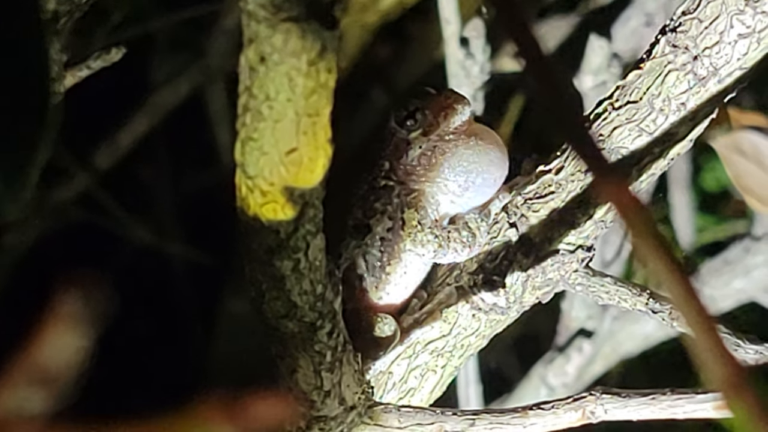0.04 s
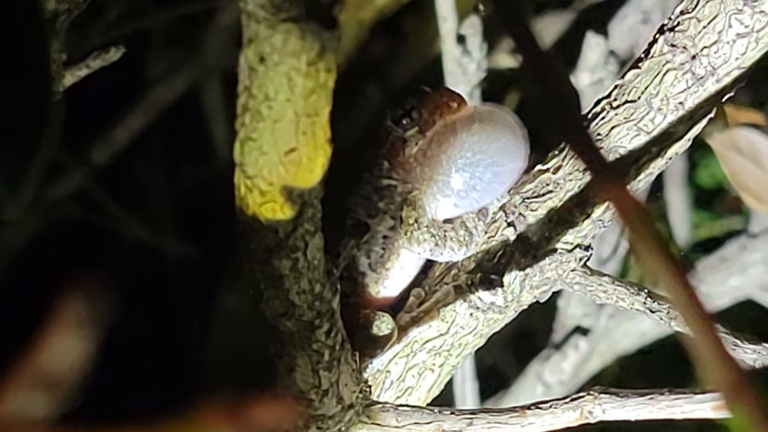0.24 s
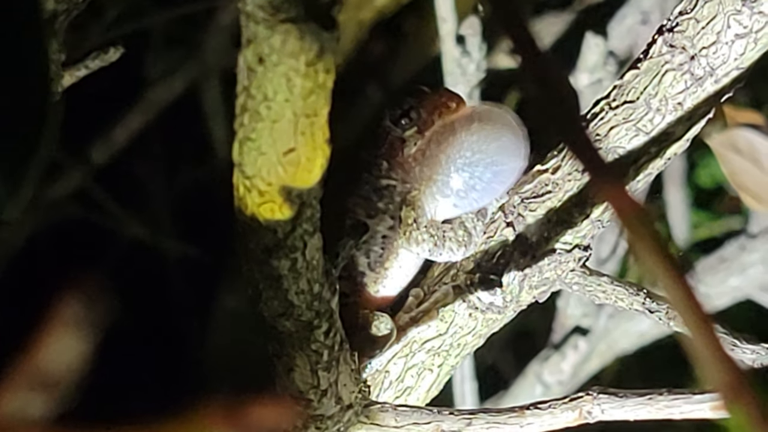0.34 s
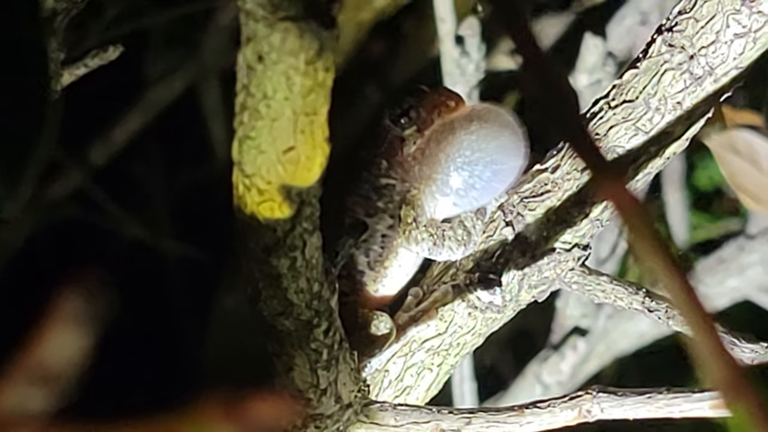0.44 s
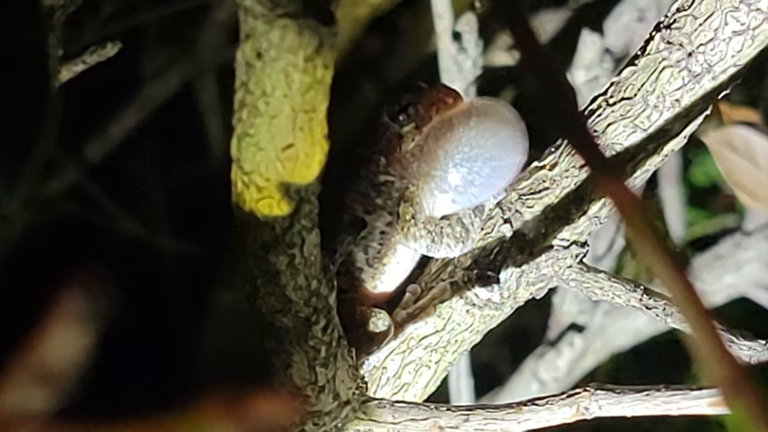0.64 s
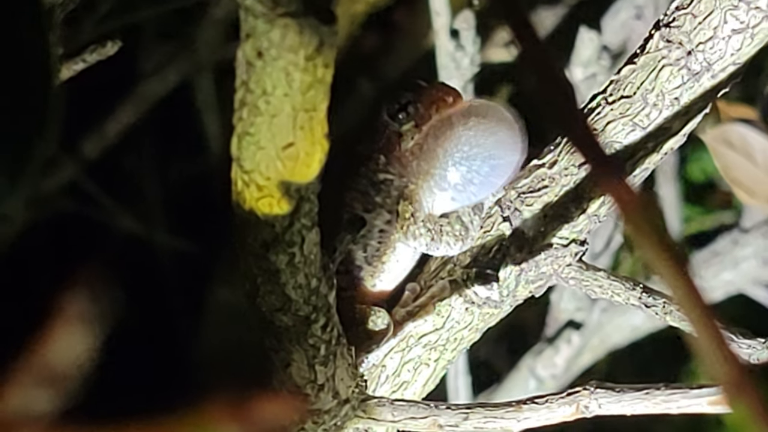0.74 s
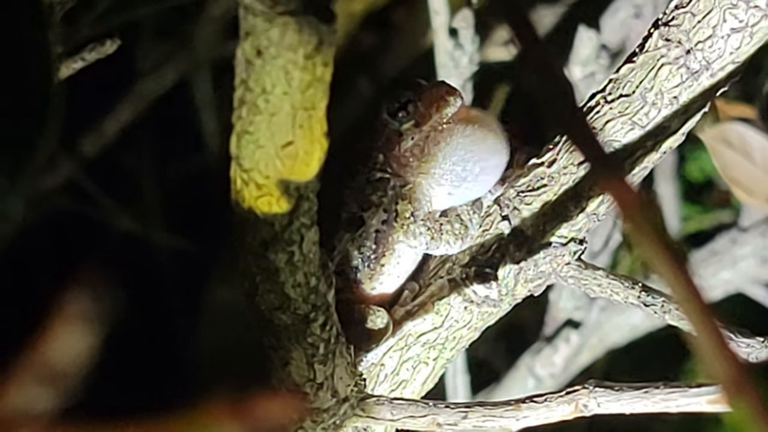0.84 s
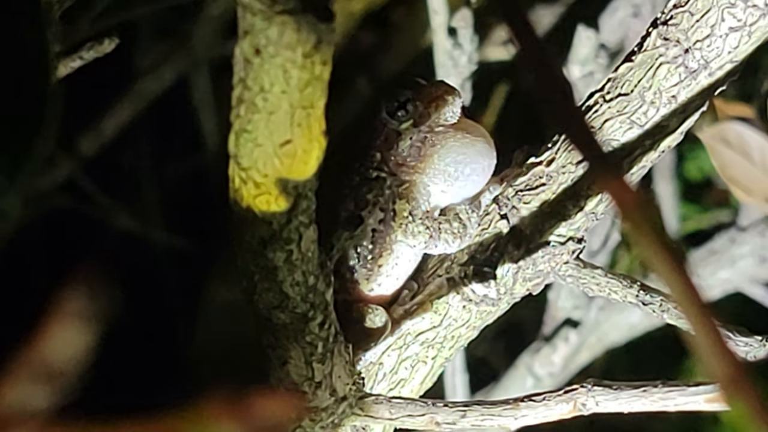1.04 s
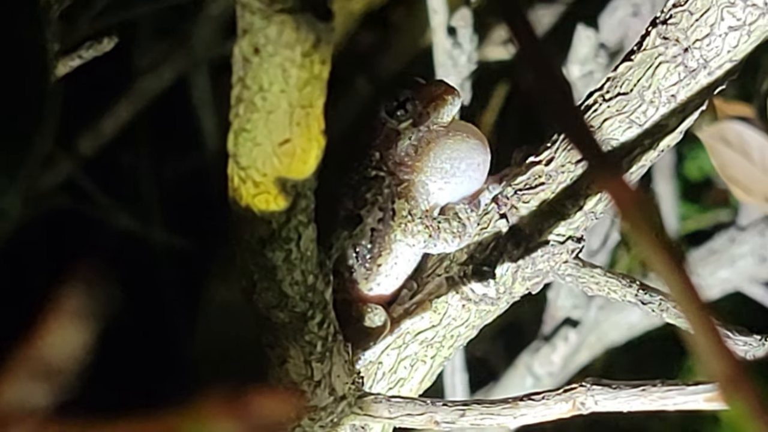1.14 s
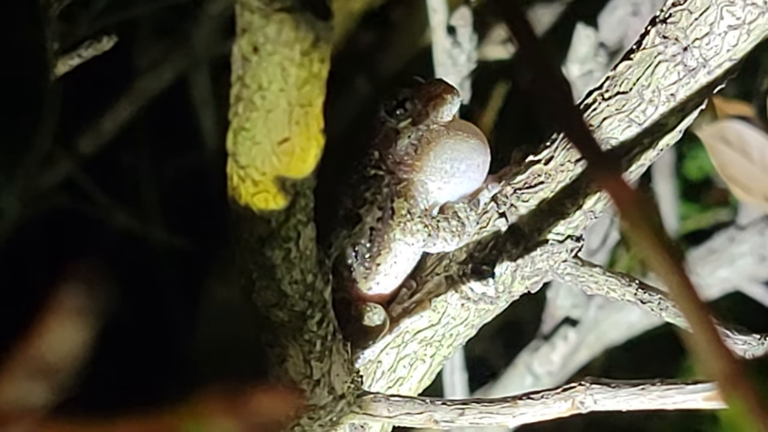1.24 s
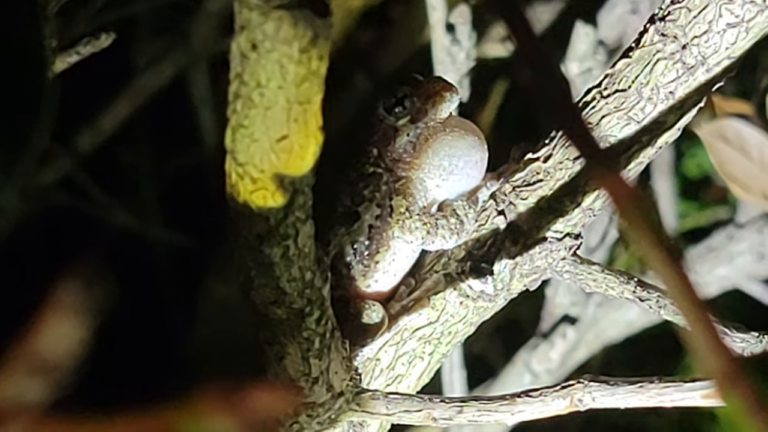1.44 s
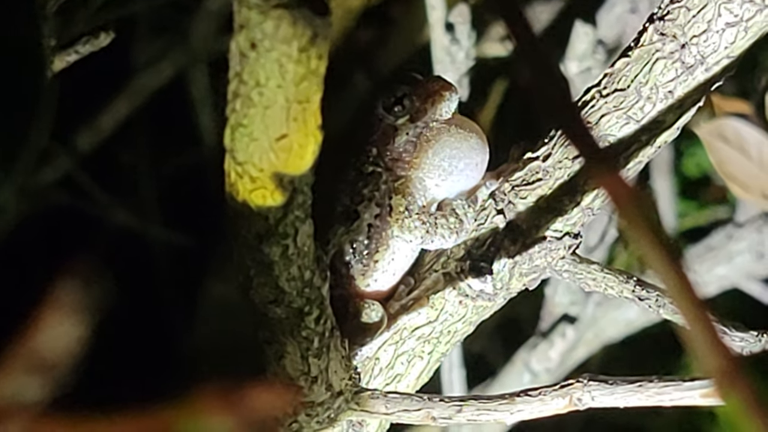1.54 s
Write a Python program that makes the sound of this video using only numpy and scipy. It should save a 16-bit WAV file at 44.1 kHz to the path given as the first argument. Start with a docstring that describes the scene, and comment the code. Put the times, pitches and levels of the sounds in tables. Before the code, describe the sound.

A tree frog gives one loud, buzzing trill close by at night.

```python
"""A tree frog close by on a branch gives one buzzing trill at night; a farther one finishes its own.
Each pulse of a trill is a short upward chirp with overtones, coloured by the vocal sac and echoed
by branches and foliage. Leaves rustle faintly and something bumps softly, over a low distant hum,
rumble, a faint distant chorus and thin hiss."""
import sys
import numpy as np
from scipy import signal
from scipy.fft import rfft, irfft, next_fast_len
from scipy.io import wavfile
from scipy.ndimage import uniform_filter1d

SR = 44100
rng = np.random.default_rng(int(sys.argv[2]) if len(sys.argv) > 2 else 0)


def transcribe(u):
    """Save the signal u as a 16-bit wav file named by the first command-line argument.

    u: samples, shape (n,) or (channels, n), limited to [-1, 1]; the rate is SR.
    q: integer samples, one column per channel.
    """
    v = np.clip(np.atleast_2d(u).T, -1, 1)
    q = np.round(v * 32767).astype(np.int16)
    wavfile.write(sys.argv[1], SR, q)


N = 70560


def amp(db):
    """Decibels to gain."""
    return 10 ** (np.asarray(db) / 20)


def unit(x):
    """Scale to unit rms."""
    return x / np.sqrt(np.mean(x ** 2) + 1e-20)


def lookup(table, hz, column=1):
    """Interpolate a table column over log frequency."""
    columns = np.transpose(table)
    return np.interp(np.log(hz + 1), np.log(columns[0] + 1), columns[column])


def shape(x, gain):
    """Filter x by gain(hz)."""
    size = next_fast_len(2 * x.shape[-1])
    return irfft(rfft(x, size) * gain(np.fft.rfftfreq(size, 1 / SR)), size)[..., :x.shape[-1]]


def highpass(f, corner_hz, order=4):
    """High-pass gain, one half at the corner."""
    return f ** order / (f ** order + corner_hz ** order)


def minimum_phase(db):
    """Response with these levels that rings after the sound, never before."""
    cepstrum = irfft(np.log(amp(db)))
    half = cepstrum.shape[-1] // 2
    return np.exp(rfft(cepstrum * np.r_[1, np.full(half - 1, 2), 1, np.zeros(half - 1)]))


def noise_band(centre_hz, width_hz):
    """Stereo noise in a Gaussian band, unit rms."""
    white = rng.standard_normal((2, N))
    return unit(shape(white, lambda f: np.exp(-.5 * ((f - centre_hz) / width_hz) ** 2)))


def add(mix, start_s, sound):
    """Mix a sound in at start_s."""
    at = round(start_s * SR)
    sound = sound[..., max(-at, 0):]
    part = mix[..., max(at, 0):][..., :sound.shape[-1]]
    part += sound[..., :part.shape[-1]]


# Night air spectrum: freq_hz, relative_db
AIR_SPECTRUM = [(15, -54), (25, -16.5), (74, -3.5), (123, -16), (200, -23.5), (241, -24), (324, -27.5),
                (361, -31), (637, -29), (981, -23.5), (1220, -27), (2810, -21.5), (3580, -26.5),
                (4570, -26.5), (15800, -34.5)]
# Left-right likeness of the air: freq_hz, correlation
AIR_CORRELATION = [(60, 0.88), (180, 0.88), (550, 0.2), (1650, -0.17), (4970, -0.12), (15000, 0.028)]

def night_air():
    """Low rumble in the centre; thin, wide hiss leaning left."""
    left, spare = rng.standard_normal((2, N))
    likeness = lambda f: lookup(AIR_CORRELATION, f)
    right = shape(left, likeness) + shape(spare, lambda f: np.sqrt(1 - likeness(f) ** 2))
    pan_db = np.array([[2.5], [-2.5]])
    spectrum = lambda f: amp(lookup(AIR_SPECTRUM, f) + pan_db * (f > 300)) * highpass(f, 28)
    return amp(-48) * unit(shape(np.array([left, right]), spectrum))


# Hum tones: pitch_hz, rms_db
HUM_TONES = [(75, -59.5), (119, -59.5), (359, -70), (597, -79.5)]

def hum():
    """Distant low tones, wavering in phase."""
    t = np.arange(N) / SR
    out = np.zeros(N)
    for pitch_hz, rms_db in HUM_TONES:
        wander_rad = .012 * np.cumsum(rng.standard_normal(N))
        out += amp(rms_db) * np.sqrt(2) * np.sin(2 * np.pi * pitch_hz * t + wander_rad)
    return out


def high_hiss():
    """Very high hiss that swells and flickers slightly."""
    band = noise_band(centre_hz=14800, width_hz=1300)
    drift = lambda rate_hz: unit(shape(rng.standard_normal(N), lambda f: np.exp(-(f / rate_hz) ** 2)))
    return band * amp(-63.5 + 2.2 * drift(rate_hz=9) + 2 * drift(rate_hz=150))


# Chorus envelope: time_s, level_db
CHORUS_LEVELS = [(0, -65), (1.1, -63.5), (1.2, -60.5), (1.35, -68.5), (1.42, -56.5), (1.5, -65), (1.6, -57)]

def chorus():
    """Distant callers blur into one faint narrow band."""
    level_db = np.interp(np.arange(N) / SR, *np.transpose(CHORUS_LEVELS))
    return noise_band(centre_hz=2866, width_hz=110) * amp(level_db)


def burst(level_db, centre_hz, rise_s, decay_s, width_oct, grain_db):
    """Puff of band noise; the higher it is, the wider in stereo."""
    t = np.arange(SR // 2) / SR
    grains = amp(grain_db * unit(uniform_filter1d(rng.standard_normal(len(t)), 60)))
    shared, left, right = rng.standard_normal((3, len(t)))
    spread = centre_hz / (centre_hz + 1200)
    noise = grains * ((1 - spread) * shared + spread * np.array([left, right]))
    band = shape(noise, lambda f: np.exp(-.5 * (np.log2((f + 1) / centre_hz) / width_oct) ** 2))
    envelope = np.minimum(t / rise_s, 1) * np.exp(-np.maximum(t - rise_s, 0) / decay_s)
    return amp(level_db) * unit(band) * envelope


# Leaf rustles: start_s, level_db, centre_hz, width_oct, rise_s, decay_s
LEAF_RUSTLES = [(0.018, -51.5, 4300, 0.54, 0.025, 0.092), (0.204, -48, 6500, 1, 0.014, 0.068),
                (.262, -59.5, 5000, 1, .012, .025), (1.045, -54, 2400, 0.69, 0.0071, 0.12),
                (1.068, -38, 2140, 0.25, .007, .009), (1.109, -57, 2260, .5, .01, 0.04),
                (1.255, -56, 4000, 1.2, 0.011, 0.027), (1.414, -42.5, 2050, 0.81, 0.0068, 0.0087),
                (1.435, -43, 1730, .35, 0.007, .013), (1.46, -47.5, 4000, 0.77, .012, 0.044),
                (1.495, -43.5, 4500, 1.3, 0.01, 0.02)]
# Low bumps: start_s, level_db, pitch_hz, rise_s, decay_s
SOFT_BUMPS = [(.002, -44, 53.7, 0.024, 0.025), (.04, -60, 700, 0.016, 0.06),
              (0.181, -53, 199, 0.011, 0.042), (.265, -50.5, 583, .012, 0.035),
              (1.509, -49, 556, 0.0032, 0.013), (1.56, -50.5, 360, 0.015, 0.075),
              (1.572, -57, 600, .008, .025)]

def undergrowth():
    """Grainy leaf rustles to the left, and soft narrow-band bumps."""
    out = np.zeros((2, N))
    for start_s, level_db, centre_hz, width_oct, rise_s, decay_s in LEAF_RUSTLES:
        rustle = burst(level_db, centre_hz, rise_s, decay_s, width_oct, grain_db=3)
        add(out, start_s, rustle * amp([[2], [-2]]))
    for start_s, *bump in SOFT_BUMPS:
        add(out, start_s, burst(*bump, width_oct=.06, grain_db=0))
    return out


# Foliage reverberation: freq_hz, level_db, t60_s
FOLIAGE_BANDS = [(300, -29, .15), (1400, -21, 0.24), (1990, -21, 0.11), (2500, -12.5, 0.35),
                 (3200, -18, .16), (4000, -18.5, 0.17), (8100, -4.5, .06)]

def foliage(voice):
    """Diffuse scatter from leaves and trunks, each band dying at its own rate."""
    hz, t, noise = signal.stft(rng.standard_normal((2, SR // 2)), SR, nperseg=256)
    t60_s = lookup(FOLIAGE_BANDS, hz, column=2)[:, None]
    decay = amp(-60 * t / t60_s) * (t > .004)
    energy = (decay ** 2).sum(1, keepdims=True) * t[1] * SR
    decay *= amp(lookup(FOLIAGE_BANDS, hz))[:, None] / np.sqrt(energy)
    tail = signal.istft(noise * decay, SR, nperseg=256)[1]
    return signal.fftconvolve(voice[None], tail, axes=1)[:, :N]


def swell(t, rise_s=.0051, fall_s=.0052):
    """Pulse envelope, cresting at t = 0; the onset is steeper than a bell curve."""
    return np.exp(-np.where(t < 0, abs(t / rise_s) ** 2.23, (t / fall_s) ** 2))


def pulse(centre_s, pitch_hz, level_db, overtones_db, partials, length_ratio=1):
    """One chirp: pitch scoops in and slides up, with rasp at the crest. Returns start_s, sound."""
    start = round(centre_s * SR) - 800
    t = ((start + np.arange(1800)) / SR - centre_s) / length_ratio
    scoop = .09 * length_ratio ** 2 * (1 - np.tanh((t + .0059) / .00086))
    slide = .074 * length_ratio * np.tanh((t + .0007) / .0016)
    phase = 2 * np.pi * np.cumsum(pitch_hz * (1 + slide - scoop)) / SR
    tone = np.zeros(len(t))
    for k, (partial_db, sharpness, lead_s) in enumerate(partials, 1):
        gain = amp(partial_db + overtones_db * (k > 1))
        tone += gain * swell(t + lead_s) ** sharpness * np.sin(k * phase)
    rasp_band = lambda f: highpass(f, 2500, order=2) / (1 + (f / 7500) ** 8)
    rasp = unit(shape(rng.standard_normal(len(t)), rasp_band))
    return start / SR, amp(level_db) * (tone + amp(overtones_db - 36) * swell(t) ** 2 * rasp)


# Far frog's harmonics, first upward: relative_db, envelope_power, lead_s
FAR_HARMONICS = [(-2.5, 2.1, 0.00062), (6, 1.25, 0.001), (-17.5, 2, 0.002)]

def far_frog(start_s=.0078, period_s=.01988, pulse_count=13):
    """The neighbour's even trill, duller and more reverberant."""
    voice = np.zeros(N)
    echo_s, echo_db = .0052, -8
    for k, (time_jitter, level_jitter) in enumerate(rng.standard_normal((pulse_count, 2))):
        centre_s = start_s + k * period_s + .00014 * time_jitter
        level_db = -28.5 - .04 * level_jitter
        at_s, chirp = pulse(centre_s, 1240, level_db, overtones_db=0, partials=FAR_HARMONICS)
        add(voice, at_s, chirp)
        add(voice, at_s + echo_s, amp(echo_db) * shape(chirp, lambda f: highpass(f, 1800)))
    return (voice + amp(13.5) * foliage(voice)) * amp([[0], [-3.5]])


# Colour of sac and surroundings: freq_hz, left_db, right_db
SAC_COLOUR = [(514, 0.9, 0.1), (870, -8.5, -10.5), (1284, -3, 2.5), (1414, 1.0, 1), (1830, -9, 4.5),
              (2050, 8, 9.5), (2060, -3, -17), (2389, 6, 8.5), (2444, 3, -8.5), (2550, 1.5, -1.75),
              (3166, 0.5, 0.15), (3557, -21.5, -13.5), (3835, 0.5, 2.25), (4600, -14, -12), (4620, -4, 0.1),
              (4990, 8, -5), (5670, -16, -25), (5930, 4.5, 10), (6150, -7, -8.5), (7100, -2.5, -11),
              (7625, 7.5, 13.5), (7940, 0, -16), (9500, -16, -18.5), (16000, -18.5, -25)]
# Nearest branches: delay_s, left_db, right_db
BRANCH_ECHOES = [(.00507, -7.5, -39.5), (.007215, -22, -24), (.007663, -19.5, -30), (0.0166, -11.5, -16)]
# Phase lead of the left microphone: freq_hz, lead_rad
LEFT_LEAD = [(1300, 1.1), (2500, 0.051), (3900, 0.81), (7500, 1.4)]

def sac_and_branches(f):
    """Near frog's stereo response: sac resonance, plus thin branches that reflect little bass."""
    mic_phase = np.exp(-1j * np.outer([0, 1], lookup(LEFT_LEAD, f)))
    echoes = sum(amp([[left_db], [right_db]]) * np.exp(-2j * np.pi * f * delay_s)
                 for delay_s, left_db, right_db in BRANCH_ECHOES)
    colour = minimum_phase([lookup(SAC_COLOUR, f), lookup(SAC_COLOUR, f, column=2)])
    return mic_phase * (1 + echoes * highpass(f, 1230)) * colour


# Short pulses as the sac fills: centre_s, pitch_hz, level_db, overtones_db, length_ratio
WARM_UP_PULSES = [(0.193, 1110, -32, -32.5, 0.83), (0.214, 1077, -24, -28.5, 0.54),
                  (.225, 1151, -22, -20, 0.52), (.236, 1168, -21.5, -20, 0.63),
                  (.246, 1219, -16.5, -12.5, .55), (0.2572, 1214, -6, -18, .52),
                  (0.2668, 1259, -15, -1.5, 0.45), (0.2869, 1271, -15.5, -0.5, .45)]
# Near frog's harmonics, first upward: relative_db, envelope_power, lead_s
NEAR_HARMONICS = [(1, 1.102, 0.00094), (3.5, 1.58, 0.0013), (-6, 2.75, 0.0024), (-28.5, 4, 0.0034),
                  (-32.5, 0.5, .002), (-23.5, 3.9, 0.0027), (-42, 1.5, .001)]

def near_frog(start_s=.27752, period_s=.020099, slowing_s=.0000281, pulse_count=32):
    """Warm-up pulses, then a steadily slowing trill whose last pulse drags."""
    voice = np.zeros(N)
    for *note, length_ratio in WARM_UP_PULSES:
        add(voice, *pulse(*note, NEAR_HARMONICS, length_ratio))
    for k in range(pulse_count):
        time_jitter, level_jitter, pitch_jitter = rng.standard_normal(3)
        drag_s = .002 * (k == pulse_count - 1)
        centre_s = start_s + k * (period_s + k * slowing_s) + .00008 * time_jitter + drag_s
        push = np.exp(-k / 1.5)  # first pulses: stronger, flatter
        pitch_hz = 1303.2 * (1 - .04 * push + .0015 * pitch_jitter)
        level_db = -10 + 5 * push + .47 * level_jitter
        overtones_db = -10 * np.exp(-k / .89)
        add(voice, *pulse(centre_s, pitch_hz, level_db, overtones_db, NEAR_HARMONICS))
    return shape(voice, sac_and_branches) + foliage(voice) * amp([[0], [-3]])


def scene():
    """Both frogs in the night air."""
    return near_frog() + far_frog() + chorus() + undergrowth() + night_air() + hum() + high_hiss()


def record(dry):
    """Round off the loudest crests, then low-pass at 15.9 kHz."""
    rounded = dry / (1 + dry ** 8) ** (1 / 8)
    lowpass = signal.firwin(511, 15900, window=("kaiser", 9), fs=SR)
    return signal.oaconvolve(rounded, lowpass[None], "same")


dry = scene()
out = record(dry)
transcribe(out)
```